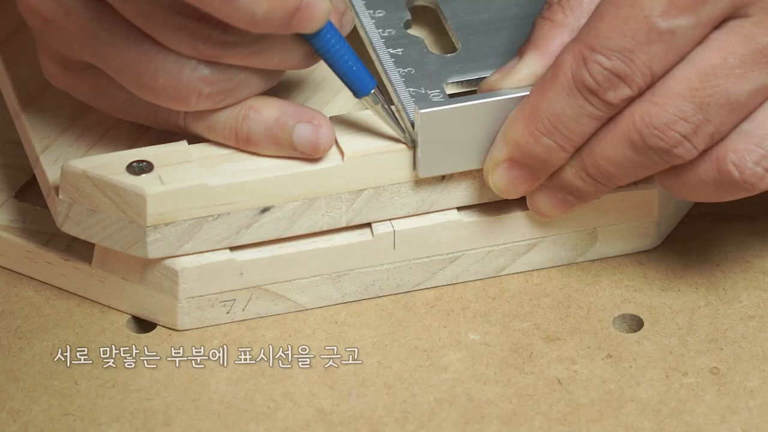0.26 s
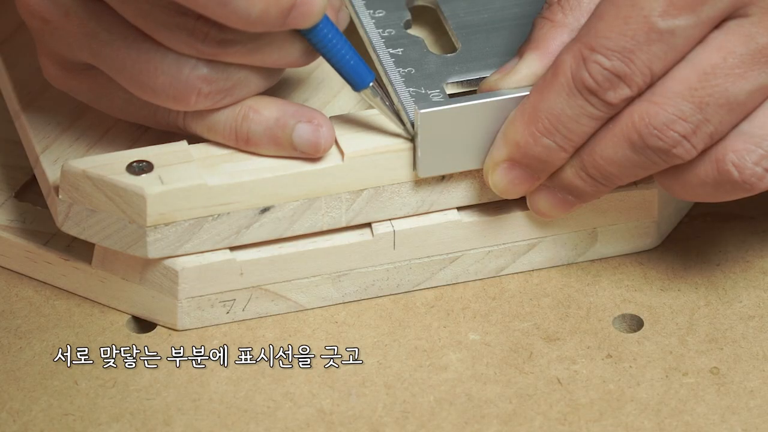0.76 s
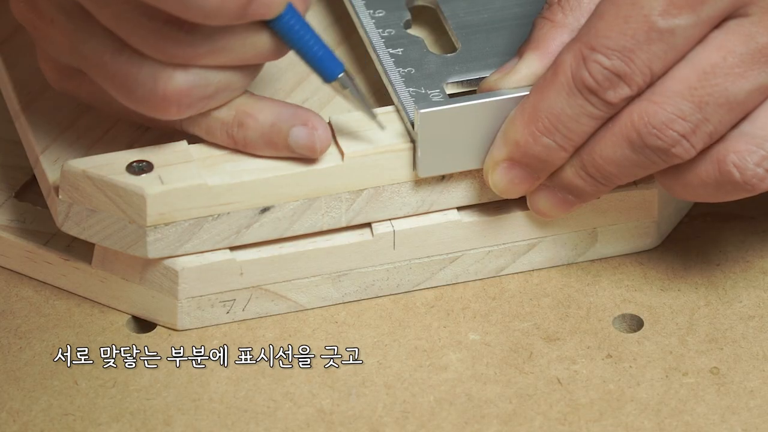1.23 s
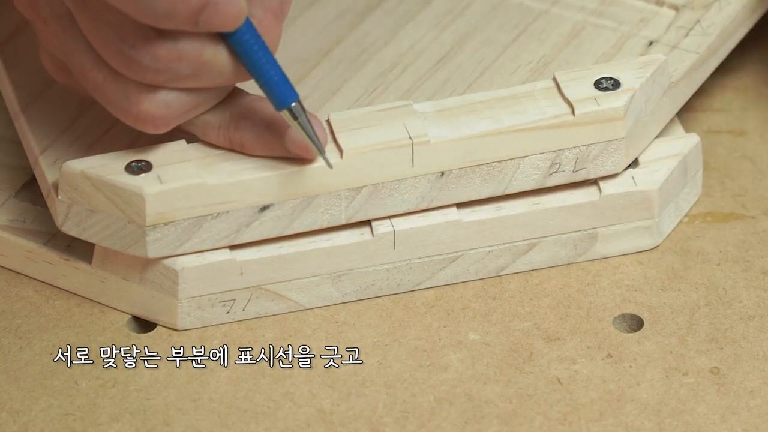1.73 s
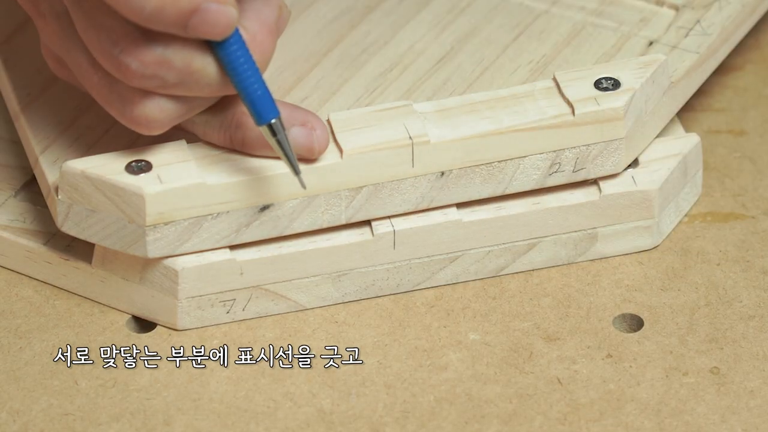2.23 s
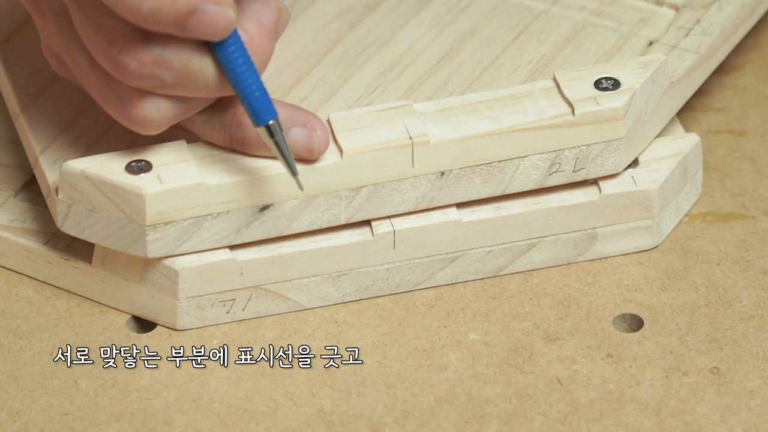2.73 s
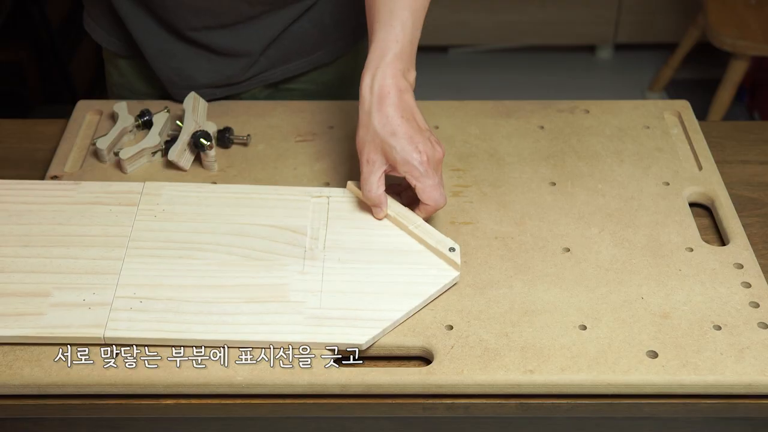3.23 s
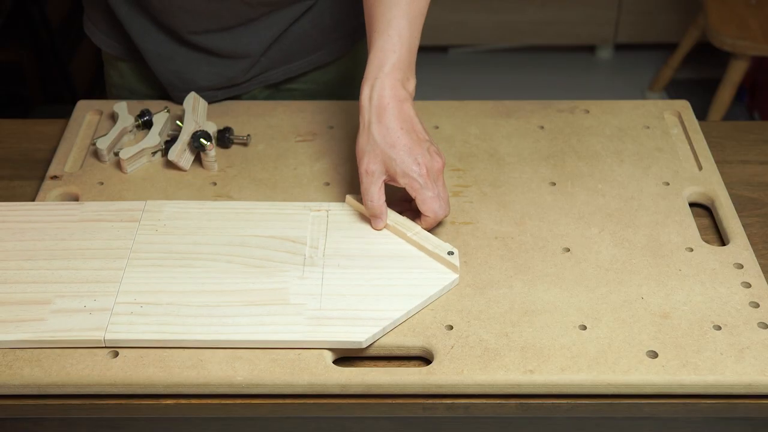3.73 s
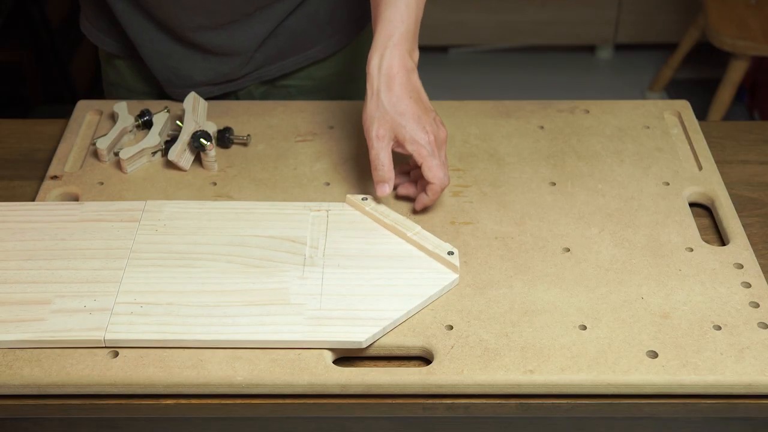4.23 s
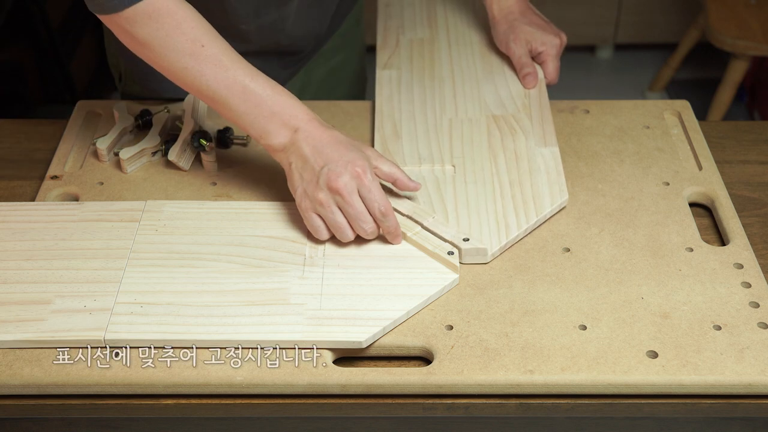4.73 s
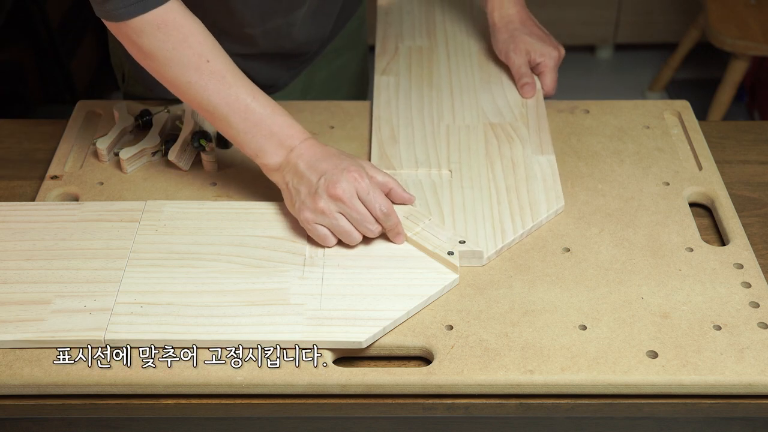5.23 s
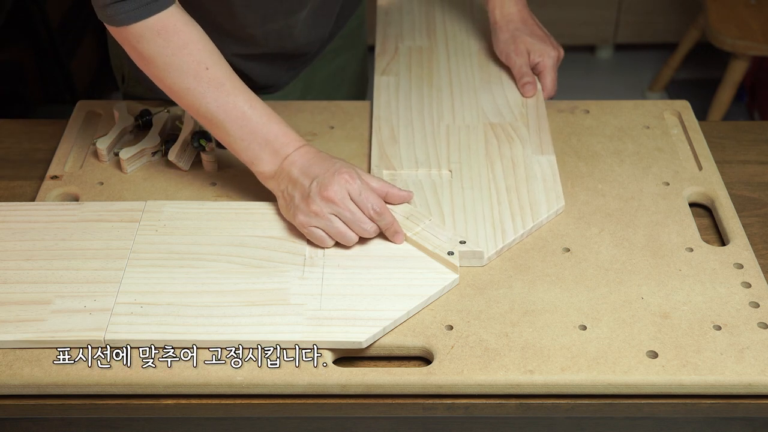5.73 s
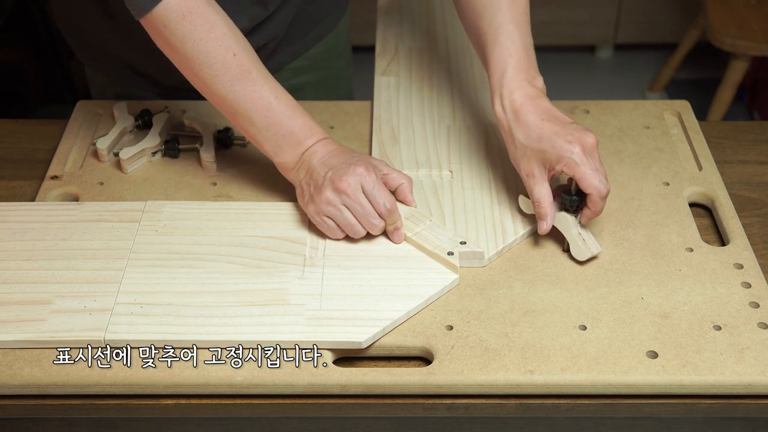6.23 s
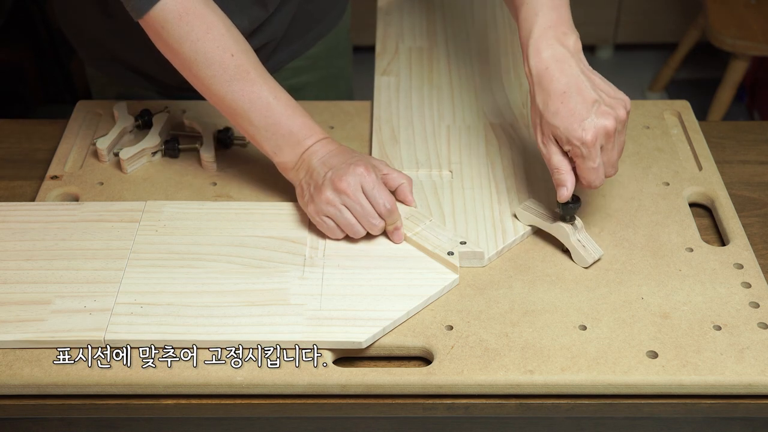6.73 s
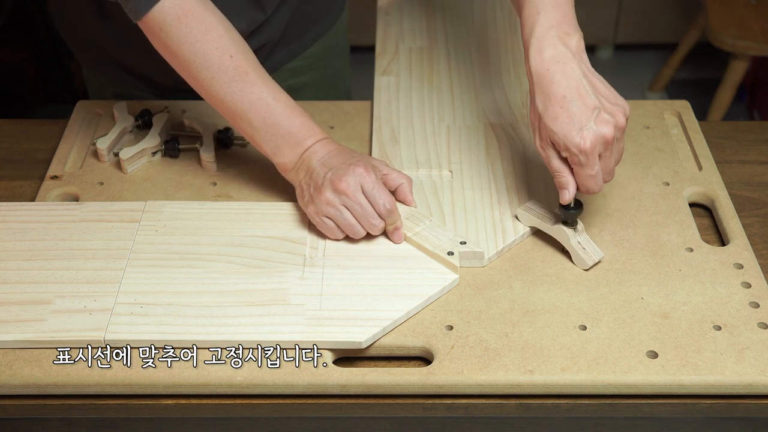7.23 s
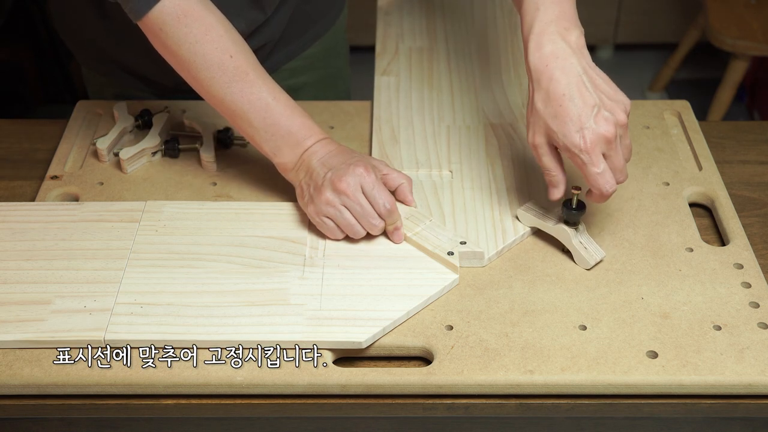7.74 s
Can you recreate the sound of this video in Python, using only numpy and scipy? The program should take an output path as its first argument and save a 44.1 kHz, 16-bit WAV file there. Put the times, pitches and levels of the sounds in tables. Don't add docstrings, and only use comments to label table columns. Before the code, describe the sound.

Soft pencil taps, pine boards clapping and butting on a bench, then a wooden clamp clacks down hard and its bolt is spun in raspy turns.

```python
import sys
import numpy as np
from scipy import signal
from scipy.fft import rfft, irfft
from scipy.io import wavfile
from scipy.ndimage import uniform_filter1d

SR = 44100
rng = np.random.default_rng(int(sys.argv[2]) if len(sys.argv) > 2 else 0)


def master_out(mix):
    frames = np.transpose(np.atleast_2d(mix))
    ceiling = np.clip(frames, -1, 1)
    pcm = np.round(ceiling * 32767).astype(np.int16)
    wavfile.write(sys.argv[1], SR, pcm)


def volts_from_decibels(level):
    exponent = np.asarray(level, float) / 20
    return 10 ** exponent


N = 351427
SIZE = 8192
REFERENCE_DB = -20

# f/Hz; for most objects, then for wood
BAND_EDGES_HZ = [350, 900, 3500, 7000, 14000]
WOOD_EDGES_HZ = [250, 900, 2000, 4000, 9000]
# t/s, peak/dB, presence/dB and highs/dB above the middle band
CLAMP_HITS = [(6.347, 0, -5, -18), (6.3497, 6, -16.5, -31.5), (6.3635, -1.5, -17.5, -20.5),
              (6.3705, 0.5, -34, -27.5), (6.3798, -11.5, -6.5, -34.5), (6.392, -11.5, -21, -34.5),
              (6.419, -11, -21.5, -30.5)]
# f/Hz, level per Hz/dB
TICK_COLOUR = [(240, -69), (400, -42), (900, -1), (1150, -5), (1490, -8.5), (6270, -11), (7880, -27),
               (14300, -78), (15400, -57.5)]
KNOB_COLOUR = [(180, -110), (300, -121), (571, -23.5), (1370, -8.5), (1780, -5.5), (2030, -3.5), (2970, -7),
               (3220, -9), (4060, -13.5), (6340, -18.5), (10700, -33.5), (13300, -46.5), (15400, -80)]
# f/Hz, width/Hz, level/dB
BUTT_MODES = [(200, 55, 3), (420, 80, 8.1), (600, 40, 5), (950, 77, 9.6), (1240, 49, 6.9), (1683, 60, 11),
              (1900, 88, 9.1), (2290, 100, 6), (2800, 80, 7.8)]
# f/Hz, width/Hz, level/dB
TURN_MODES = [
    [(598, 35, 8), (958, 130, 9), (1250, 44, 8), (1738, 53, 10.5), (2416, 140, 13), (2810, 130, 12),
     (3250, 180, 7.5), (3965, 120, 13.5), (5040, 100, 4), (7160, 170, 6.5), (10550, 200, 9.5)],
    [(590, 38, -4), (1824, 170, 9), (2230, 82, 6.5), (2416, 63, 9), (2644, 80, 11), (2950, 140, 7),
     (3550, 65, 10), (3975, 80, 11.5), (4270, 250, 6), (5000, 90, 4), (7650, 500, 10)],
    [(584, 33, 3), (1527, 38, 7), (1790, 92, 15), (2443, 130, 12.5), (2695, 74, 6.5), (2986, 75, 15.5),
     (3330, 83, 8), (3966, 105, 12.5), (5050, 98, 6.5), (5600, 93, 8.5), (10430, 47, 19.5)],
]


def at_hz(points, hz):
    points = np.array(points)
    return np.interp(np.log(hz), np.log(points[:, 0]), points[:, 1])


def rms_one(x):
    return x / np.sqrt(np.mean(x ** 2) + 1e-20)


def high_pass(x, order, cut_hz):
    return signal.sosfilt(signal.butter(order, cut_hz, "high", fs=SR, output="sos"), x)


def stereo_bands(length, likeness):
    edges = 45 * 2 ** np.arange(0, 8.6, .5)
    white = rng.standard_normal((2, 2, length))
    for k, (low, high) in enumerate(zip(edges, edges[1:])):
        band_filter = signal.butter(2, [low, high], "band", fs=SR, output="sos")
        mid, side = signal.sosfilt(band_filter, white[k % 2])
        centre = np.sqrt(low * high)
        alike = np.clip(at_hz(likeness, centre), -1, 1)
        yield centre, np.sqrt(1 + alike) * mid + np.sqrt(1 - alike) * side * [[1], [-1]]


def body(colour, modes, rel_db, push=(1,), spread_db=0, edges_hz=BAND_EDGES_HZ):
    hz = np.arange(SIZE // 2 + 1) * SR / SIZE + 1
    below = np.maximum(np.log2(colour[0][0] / hz), 0)
    gain = volts_from_decibels(at_hz(colour, hz) - 13 * below)

    lift = 1
    for (mode_hz, width, db), (chance, shift) in zip(modes, rng.standard_normal((15, 2))):
        height = (volts_from_decibels(db + spread_db * chance) - 1).clip(0)
        pitch = mode_hz * (1 + .006 * spread_db * shift)
        lift = lift + height / (1 + (2 * (hz - pitch) / width) ** 2) ** .75

    power = np.add.reduceat((gain * lift) ** 2, np.searchsorted(hz, edges_hz))[:-1] * 2 / SIZE
    tilt_db = np.insert(rel_db, 1, 0) - 10 * np.log10(power)
    log_centres = np.convolve(np.log(edges_hz), [.5, .5], "valid")
    gain *= lift * volts_from_decibels(np.interp(np.log(hz), log_centres, tilt_db))
    gain /= np.sqrt(uniform_filter1d(np.abs(rfft(push, SIZE)) ** 2, size=40))

    cepstrum = irfft(np.log(gain))
    cepstrum[1:SIZE // 2] *= 2
    cepstrum[SIZE // 2 + 1:] = 0
    return signal.fftconvolve(push, irfft(np.exp(rfft(cepstrum))))


def strikes(rows, colour, modes, trim_db, lead_ms, swell, edges_hz=BAND_EDGES_HZ, spread_db=2.5):
    out = np.zeros(N + 2 * SIZE)
    for s, peak_db, low_db, presence_db, high_db, ms in rows:
        phase = np.arange(4096) / (max(ms, .3) * SR / 1000)
        push = rng.standard_normal(4096) * phase ** swell * np.exp(-3 * phase)
        hit = body(colour, modes, [low_db, presence_db, high_db], push, spread_db, edges_hz)
        at = round((s - lead_ms / 1000) * SR)
        out[at:at + len(hit)] += volts_from_decibels(peak_db + trim_db) * hit
    return out[:N]


def chatter(tables, colour, modes, per_s, trim_db, rel_db):
    level = np.zeros(N)
    for rows in tables:
        s, db = np.transpose(rows)
        level += volts_from_decibels(np.interp(np.arange(N) / SR, s, db, left=-200, right=-200))
    size_db = 2.5 * np.minimum(rng.exponential(1, N), 4)
    sizes = volts_from_decibels(size_db) * rng.choice([-1, 1], N)
    slips = rms_one(sizes * (rng.random(N) < per_s / SR))
    return volts_from_decibels(trim_db) * signal.fftconvolve(slips * level, body(colour, modes, rel_db))[:N]


def dull(rows, contact_ms, rolloff_db, rolloff_per_db):
    return [(s, db, low, mid, mid + rolloff_db + rolloff_per_db * (db - REFERENCE_DB), contact_ms)
            for s, db, low, mid in rows]


def bright(rows, contact_ms, lows_db, lows_per_db):
    return [(s, db, lows_db + lows_per_db * (db - REFERENCE_DB), mid, high, contact_ms)
            for s, db, mid, high in rows]


def even(tail):
    spectrum = rfft(tail)
    power = np.mean(np.abs(spectrum) ** 2, axis=0)
    flat = spectrum * np.sqrt(uniform_filter1d(power, size=500) / uniform_filter1d(power, size=40))
    length = tail.shape[1]
    return irfft(flat, length) * np.clip(np.arange(length)[::-1] / 2000 - 1, 0, 1)


def workshop(x, left_db, linger, room_db=2.5):
    # f/Hz, likeness
    room_likeness = [(300, .93), (600, .97), (1200, .94), (2500, .88), (5000, .6), (12000, .3)]
    # f/Hz, time/s
    room_t60 = [(300, 0.17), (1000, 0.2), (2500, 0.23), (6000, 0.25), (12000, 0.22)]
    t = np.arange(SR // 2) / SR
    late = volts_from_decibels(-28 - 60 * t / 0.45)
    tail = 0
    for hz, band in stereo_bands(len(t), room_likeness):
        fall = volts_from_decibels(-60 * (t / linger / at_hz(room_t60, hz)) ** 1.134)
        tail = tail + band * (fall + late)
    lumps = np.interp(t, np.arange(250) / 500, rng.standard_normal(250))
    first_echo_ms = 1.62
    tail = even(tail * volts_from_decibels(2.5 * lumps)) * np.clip(t * 1000 / first_echo_ms - 1, 0, 1)
    tail *= volts_from_decibels(room_db) / np.sqrt(np.sum(tail ** 2) / 2)
    wet = x + signal.fftconvolve(x[None], tail, axes=1)[:, :N]
    return wet * volts_from_decibels(np.array([[left_db], [-left_db]]) / 2)


def air():
    # f/Hz, level per Hz/dB
    hush_colour = [(35, -78), (60, -48), (171, -22.5), (319, -14), (452, -11), (571, -8.5), (951, -3),
                   (1290, 1.5), (1700, 1.5), (2200, -11), (2410, 1.5), (3570, -6.5), (4010, -7.5),
                   (8060, -14), (15400, -18.5)]
    # f/Hz, likeness
    hush_likeness = [(60, 0.61), (180, 0.6), (550, 0.39), (1650, 0.53), (4970, 0.25), (15000, 0.074)]
    hush = sum(volts_from_decibels(at_hz(hush_colour, hz)) * band for hz, band in stereo_bands(N, hush_likeness))
    return volts_from_decibels(-60.5) * rms_one(hush)


def pencil():
    # t/s, peak/dB, lows/dB and presence/dB above the middle band
    pencil_hits = [
        (0.611, -35.5, -8, -12.5),
        (0.6983, -43.5, -40, -23),
        (0.7733, -46, -8, -11),
        (0.8198, -53, -4, -24.5),
        (1.0592, -31, -10.5, -17.5),
        (1.1299, -45, -8, -20),
        (1.1994, -44, -43, -28),
    ]
    square_hits = [
        (1.3446, -51.5, -25, -7.5),
        (1.3738, -44.5, -17, -14),
        (1.414, -44, -25, -12.5),
        (1.4394, -46, -18, -13),
    ]
    # f/Hz, level per Hz/dB
    pencil_colour = [(150, -97), (250, -54), (490, -20), (575, -16), (808, -16), (1220, -17.5), (2520, -14),
                     (2850, -10.5), (5030, -18), (7610, -20.5), (15400, -54)]
    # f/Hz, width/Hz, level/dB
    pencil_modes = [(595, 52, 14), (1184, 104, 14.5), (1710, 200, 9), (3050, 230, 9.5), (3720, 200, 4),
                    (4700, 240, 3.5)]
    square_modes = [(1800, 120, 5.6), (2370, 200, 8.9), (2950, 120, 5.5), (4550, 70, 15), (4850, 70, 16)]
    on_wood = dull(pencil_hits, contact_ms=36.0, rolloff_db=6.5, rolloff_per_db=0.6)
    on_steel = dull(square_hits, contact_ms=14.0, rolloff_db=6.0, rolloff_per_db=0.5)
    out = strikes(on_wood, pencil_colour, pencil_modes, trim_db=19.5, lead_ms=9.7, swell=1.0)
    return out + strikes(on_steel, pencil_colour, square_modes, trim_db=18.0, lead_ms=15.0, swell=0.96)


def panel_landing():
    # t/s, peak/dB, lows/dB and presence/dB above the middle band
    landing_hits = [
        (3.1165, -33, -14, -23),
        (3.1203, -20, -26, -20),
        (3.1278, -39.5, 1, -7),
        (3.14, -34.5, -13, -15),
        (3.1587, -29, -20, -12),
        (3.1665, -41, -20, -18),
        (3.1946, -36.5, -26, -9),
    ]
    # f/Hz, level per Hz/dB
    landing_colour = [(88, -84), (150, -37), (287, -21.5), (465, -16), (577, -8), (1030, -12), (1120, -7),
                      (1570, -15), (1820, -13), (8000, -49), (10400, -85), (17600, -120)]
    # f/Hz, width/Hz, level/dB
    landing_modes = [(200, 40, 6), (294, 27, 14), (580, 37, 12), (795, 44, 7.4), (910, 40, 5),
                     (1127, 57, 13.7), (1264, 51, 11), (1400, 44, 7.6), (1700, 50, 7), (1800, 100, 4),
                     (3120, 200, 8.7), (3450, 150, 9)]
    rows = dull(landing_hits, contact_ms=7.1, rolloff_db=-22.5, rolloff_per_db=0.0)
    return strikes(rows, landing_colour, landing_modes, trim_db=19.0, lead_ms=2.3, swell=0.62,
                   edges_hz=WOOD_EDGES_HZ)


def boards_sliding():
    # t/s, level/dB
    slides = [
        [(3.39, -71), (3.45, -65.5), (3.53, -74)],
        [(3.58, -54.5), (3.72, -68)],
        [(4.84, -72), (4.906, -56), (5.022, -59), (5.25, -72)],
    ]
    return chatter(slides, KNOB_COLOUR, BUTT_MODES, per_s=700, trim_db=4.0, rel_db=[-12., -19., -30.])


def panel_drop():
    # t/s, peak/dB, lows/dB and presence/dB above the middle band
    panel_hits = [(3.474, -35, -45, -21), (3.509, -42, -30, -25), (3.5245, -16.5, -39, -18),
                  (3.5305, -11, -38, -21.5), (3.5385, -26, -20, -18), (3.545, -23, -4.5, -18),
                  (3.5534, -28, -4, -30), (3.568, -39, -6, -19), (3.584, -29.5, -16, -15),
                  (3.6096, -38, -24, 8), (3.6238, -41, -27, 8), (3.637, -51, -17, 0), (3.667, -54, -15, -4)]
    # f/Hz, level per Hz/dB
    panel_colour = [(88, -83), (150, -40.5), (362, -27.5), (428, -12), (819, -11), (890, -7), (1140, -18),
                    (1820, -22), (3310, -51), (8000, -53), (10400, -88), (17600, -120)]
    # f/Hz, width/Hz, level/dB
    panel_modes = [(245, 40, 12.7), (445, 21, 14), (596, 40, 5), (948, 71, 12), (1170, 100, 16.5),
                   (1370, 80, 4.9), (1770, 80, 10.2), (2080, 110, 5), (2620, 150, 3.9), (5500, 200, 9)]
    rows = dull(panel_hits, contact_ms=5.5, rolloff_db=-35.0, rolloff_per_db=-0.3)
    return strikes(rows, panel_colour, panel_modes, trim_db=16.0, lead_ms=4.0, swell=3.5,
                   edges_hz=WOOD_EDGES_HZ)


def hand_scuff():
    # t/s, peak/dB, presence/dB and highs/dB above the middle band
    scuff_hits = [
        (4.5245, -41.5, 3.5, 4.5),
        (4.54, -48, -7, 3),
        (4.6, -56.5, 1, -1.5),
        (4.66, -59, 0, 0.5),
        (4.73, -62.5, -3.5, 5),
    ]
    # f/Hz, level per Hz/dB
    scuff_colour = [(400, -41), (1300, -10), (2200, 4), (5500, -3), (9000, -6.5), (15400, -22.5)]
    # f/Hz, width/Hz, level/dB
    scuff_modes = [(2820, 200, 0), (4830, 300, 6), (6090, 1400, 11), (7550, 400, 4), (8760, 300, 1.5)]
    rows = bright(scuff_hits, contact_ms=21.0, lows_db=-18.0, lows_per_db=0.0)
    return strikes(rows, scuff_colour, scuff_modes, trim_db=16.0, lead_ms=1.1, swell=0.3)


def boards_meeting():
    # t/s, peak/dB, lows/dB and presence/dB above the middle band
    butt_hits = [(4.8532, -37.5, -21, -11), (4.8857, -38, -16, -6), (4.8973, -24, -15, -10.5),
                 (4.905, -35.5, 3, -13), (4.9295, -40, 3, 0), (4.955, -40.5, 1, 0),
                 (4.9778, -25.5, -13.5, -11.5), (4.9978, -44, 0, -12), (5.014, -47, 4, -5),
                 (5.06, -52, -29, 5), (5.105, -51, -17, 7.5)]
    # f/Hz, level per Hz/dB
    butt_colour = [(88, -82), (150, -41), (428, -4), (481, -12), (846, -7.5), (1200, -1.5), (1440, -4),
                   (2800, -3), (3420, -12), (8000, -41), (10400, -67), (17600, -120)]
    rows = dull(butt_hits, contact_ms=7.6, rolloff_db=-16.0, rolloff_per_db=0.0)
    return strikes(rows, butt_colour, BUTT_MODES, trim_db=14.0, lead_ms=1.5, swell=0.78,
                   edges_hz=WOOD_EDGES_HZ)


def thread_rasp():
    # t/s, level/dB
    spins = [
        [(5.87, -63), (5.95, -49)],
        [(6.2, -65), (6.3, -62)],
        [(6.89, -42), (6.944, -29.5), (7.018, -27.5), (7.05, -40)],
        [(7.26, -63), (7.33, -24), (7.42, -19.5)],
        [(7.64, -40), (7.775, -16.5), (7.82, -37)],
    ]
    # f/Hz, width/Hz, level/dB
    loose_modes = [(1500, 110, 6), (1840, 120, 10), (2200, 120, 7), (2470, 120, 11), (2970, 170, 7),
                   (3480, 150, 8), (4080, 170, 11), (5700, 250, 5), (10450, 110, 7)]
    # lows/dB, presence/dB, highs/dB above the middle band
    rasp_balance = [
        (-17.5, -24, -42),
        (-27.5, -16.5, -40),
        (-21, -19, -31),
    ]
    out = chatter(spins[:2], KNOB_COLOUR, loose_modes, per_s=830, trim_db=-6.5, rel_db=[-22., -18., -38.])
    for rows, modes, rel_db in zip(spins[2:], TURN_MODES, rasp_balance):
        out += chatter([rows], KNOB_COLOUR, modes, per_s=1100, trim_db=-6.0, rel_db=rel_db)
    return out


def bolt_ring():
    # f/Hz, t/s, time to fall 60 dB/s
    ring_pitches = [
        (13680, 6.04, 3),
        (3520, 5.95, .6),
        (3050, 5.88, .4),
    ]
    ring_db = [-60.5, -68, -59]
    out, t = np.zeros(N), np.arange(N) / SR
    put_down = t < CLAMP_HITS[1][0]
    for (hz, s, t60), db in zip(ring_pitches, ring_db):
        age = np.maximum(t - s, 0)
        jostle = np.interp(t, np.arange(800) / 100, rng.standard_normal(800))
        ring = volts_from_decibels(db - 60 * age / t60) * jostle * np.sin(2 * np.pi * hz * t)
        out += ring * (age > 0) * put_down
    return out


def bolt_rattle():
    # t/s, peak/dB, presence/dB and highs/dB above the middle band
    bolt_hits = [(5.9456, -30, -8.5, 4.5), (5.9534, -23.5, -8.5, 1.5), (5.9694, -14.5, -13, 0.5),
                 (5.9814, -15, -10.5, 7.5), (5.9874, -20.5, -12, -4), (5.9994, -27, -23, -3),
                 (6.0168, -23.5, -4.5, -1), (6.3021, -11, -16, -9), (6.3144, -24.5, 3, 3),
                 (6.3271, -7, -20, -10), (6.3606, -1, -17.5, -2)]
    # f/Hz, level per Hz/dB
    bolt_colour = [(180, -71.5), (300, -40.5), (580, -20), (651, -18), (781, -17.5), (1140, -12.5),
                   (2480, -6), (3070, -5.5), (3620, -5.5), (5120, -3), (8530, -13.5), (10900, -29.5),
                   (15400, -27)]
    # f/Hz, width/Hz, level/dB
    bolt_modes = [(590, 50, 3), (794, 110, 15.2), (3515, 110, 12.7), (8260, 500, 10), (9080, 600, 12),
                  (10500, 64, 15), (13650, 60, 8)]
    steel_edges_hz = [350, 900, 4000, 7000, 11000]
    rows = bright(bolt_hits, contact_ms=3.02, lows_db=-9.0, lows_per_db=0.14)
    return strikes(rows, bolt_colour, bolt_modes, trim_db=10.0, lead_ms=1.2, swell=2.6,
                   edges_hz=steel_edges_hz)


def clamp_touch():
    # t/s, peak/dB, lows/dB and presence/dB above the middle band
    touch_hits = [
        (6.256, -34.5, -17.5, -12.5),
        (6.2674, -35.5, 3.5, -16),
        (6.2814, -33.5, 4.5, -12),
    ]
    # f/Hz, level per Hz/dB
    touch_colour = [(180, -67.5), (300, -35.5), (757, -1.5), (1280, -9.5), (1440, -20.5), (3180, -28.5),
                    (3520, -31), (4610, -38.5), (9000, -34), (11700, -61), (19800, -120)]
    # f/Hz, width/Hz, level/dB
    touch_modes = [(600, 60, 10), (900, 90, 9), (1250, 90, 10), (3500, 60, 10)]
    rows = dull(touch_hits, contact_ms=12.0, rolloff_db=4.0, rolloff_per_db=0.7)
    return strikes(rows, touch_colour, touch_modes, trim_db=15.5, lead_ms=5.7, swell=0.85,
                   edges_hz=WOOD_EDGES_HZ)


def clamp_drop():
    # f/Hz, level per Hz/dB
    clamp_colour = [(180, -53.5), (300, -44.5), (490, -39.5), (570, -21), (1280, -11), (2100, -10.5),
                    (2400, -11), (2690, -14.5), (3280, -17), (4480, -28.5), (7000, -38), (15400, -60)]
    # f/Hz, width/Hz, level/dB
    clamp_modes = [(590, 51, 18.5), (928, 50, 13), (1022, 50, 8.4), (1260, 54, 7), (1700, 46, 7.9),
                   (1812, 110, 10), (2107, 60, 6), (2240, 60, 6.6), (2447, 90, 10), (2655, 90, 5),
                   (3490, 160, 5.4)]
    rows = bright(CLAMP_HITS, contact_ms=2.77, lows_db=-26.0, lows_per_db=0.0463)
    return strikes(rows, clamp_colour, clamp_modes, trim_db=12.0, lead_ms=0.94, swell=0.7)


def clamp_tick():
    # t/s, peak/dB, presence/dB and highs/dB above the middle band
    tick_hits = [
        (6.6253, -11, -16, -39),
    ]
    # f/Hz, width/Hz, level/dB
    tick_modes = [(1470, 110, 8.1), (1820, 160, 4.3), (2420, 100, 7.2), (2900, 120, 5.1), (3900, 250, 4),
                  (6290, 500, 2)]
    rows = bright(tick_hits, contact_ms=4.2, lows_db=-36.0, lows_per_db=-0.84)
    return strikes(rows, TICK_COLOUR, tick_modes, trim_db=3.5, lead_ms=0.4, swell=0.535)


def clamp_nudge():
    # t/s, peak/dB, presence/dB and highs/dB above the middle band
    nudge_hits = [
        (6.761, -32, -25, -37),
        (6.7775, -38, -29, -36),
    ]
    # f/Hz, width/Hz, level/dB
    nudge_modes = [(1250, 90, 14), (3000, 250, 10)]
    rows = bright(nudge_hits, contact_ms=3., lows_db=-33.0, lows_per_db=0)
    return strikes(rows, TICK_COLOUR, nudge_modes, trim_db=8.0, lead_ms=.6, swell=0.82)


def knob_turns():
    # t/s, peak/dB, presence/dB and highs/dB above the middle band
    knob_hits = [(6.8976, -21, -22, -60), (6.9661, -19, -27, -63), (6.9758, -16.5, -17, -62),
                 (6.9945, -7.5, -18, -78), (7.0081, -14, -19, -63), (7.024, -25, -19, -59),
                 (7.0368, -8.5, -10, -27), (7.043, -3.5, -8.5, -16), (7.048, -11.5, -27, -6),
                 (7.061, -11, -31, -23), (7.073, -13.5, -22, -9), (7.086, -23, -4, -35),
                 (7.258, -26, -13, -32), (7.2639, -11, -8.5, -29), (7.304, -17.5, -10, -36),
                 (7.3515, -8.5, -21, -53), (7.367, -14, -16, -50), (7.379, -7, -15, -45),
                 (7.396, -14, -19, -54), (7.4111, -5.5, 1.5, -28), (7.416, 3, -19, -36.5),
                 (7.4262, -4, -8, -26.5), (7.438, -9, -15, -30), (7.467, -19, -16, -38),
                 (7.484, -14.5, -15.5, -41), (7.6478, -22.5, 0.5, -50), (7.662, -13.5, -6.5, -45),
                 (7.6924, -11.5, -7, -43), (7.721, -14, -10, -29), (7.729, -8, -4.5, -39),
                 (7.7378, -10, -22, -29), (7.751, -14.5, -15, -18), (7.7644, -8, -14, -27),
                 (7.7703, -4, -9, -23.5), (7.7754, 0.7, -11, -22.5), (7.7867, -13, -7, -16),
                 (7.803, -8.5, -21, -30), (7.954, -31, -6, -32), (7.9615, -14.5, -10, -39)]
    turn_start_s = [6.85, 7.23, 7.62, 8]
    turn_lows_db = [-31, -44.5, -34]
    turn = np.searchsorted(turn_start_s, [row[0] for row in knob_hits]) - 1
    out = np.zeros(N)
    for this, modes in enumerate(TURN_MODES):
        hits = [row for row, k in zip(knob_hits, turn) if k == this]
        rows = bright(hits, contact_ms=4.87, lows_db=turn_lows_db[this], lows_per_db=0.06)
        out += strikes(rows, KNOB_COLOUR, modes, trim_db=12.0, lead_ms=3.0, swell=2.37, spread_db=1.7)
    return out


def scene():
    room = workshop(pencil(), left_db=-0.5, linger=1.47)
    room += workshop(panel_landing(), left_db=1.6, linger=1.47, room_db=1)
    boards = boards_sliding() + panel_drop() + boards_meeting()
    room += workshop(boards, left_db=0.5, linger=1.0, room_db=-1)
    room += workshop(hand_scuff() + clamp_tick(), left_db=-1.0, linger=0.89, room_db=5.5)
    room += workshop(bolt_ring() + bolt_rattle() + clamp_touch(), left_db=-0.7, linger=0.89)
    room += workshop(clamp_drop() + clamp_nudge(), left_db=-1.2, linger=1.02)
    room += workshop(thread_rasp() + knob_turns(), left_db=-0.6, linger=0.96, room_db=0.5)
    return high_pass(room, 3, 130) + air()


def roll_off(x):
    return signal.sosfilt(signal.butter(12, 15590, fs=SR, output="sos"), x)


def record(dry):
    lost = dry - np.clip(dry, -.97, .97)
    lost = high_pass(lost, 2, 300)
    return roll_off(dry - lost)


dry = scene()
out = record(dry)
master_out(out)
```